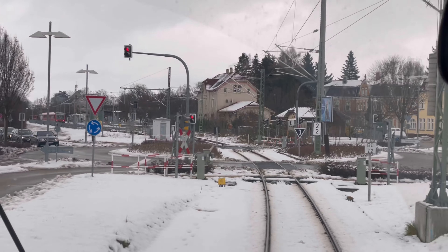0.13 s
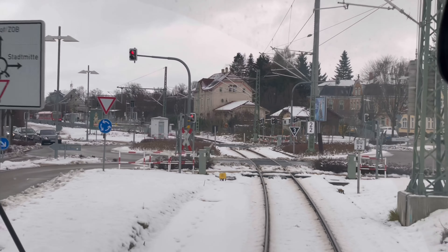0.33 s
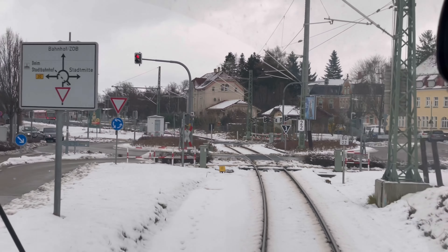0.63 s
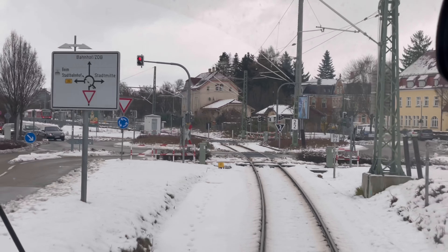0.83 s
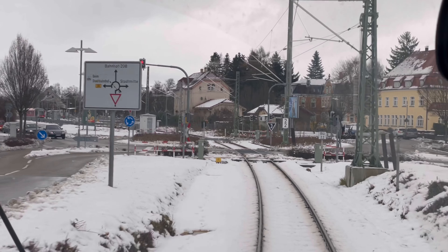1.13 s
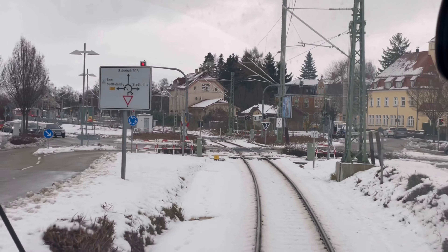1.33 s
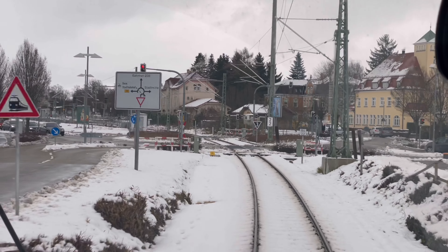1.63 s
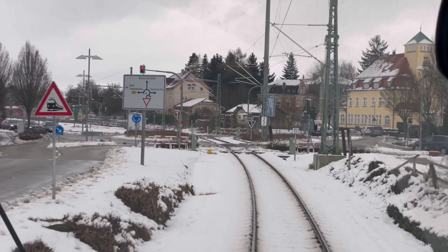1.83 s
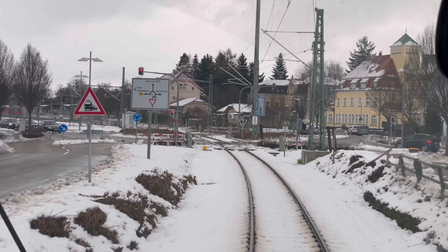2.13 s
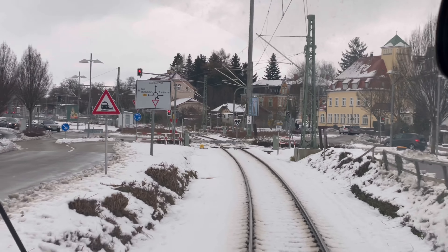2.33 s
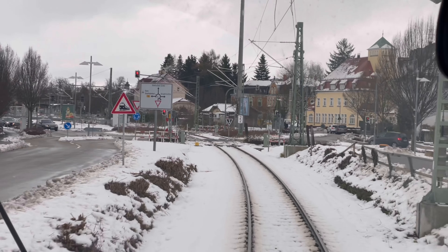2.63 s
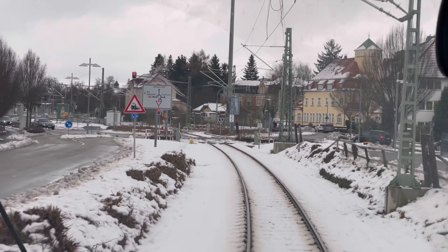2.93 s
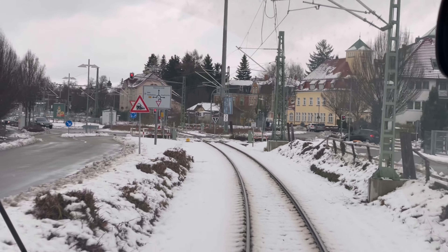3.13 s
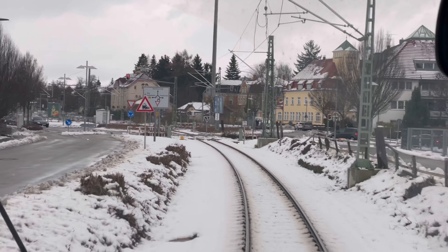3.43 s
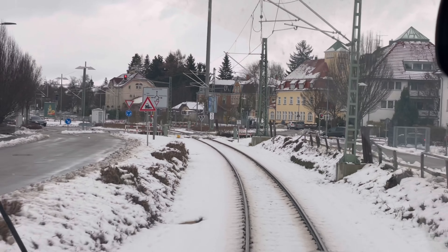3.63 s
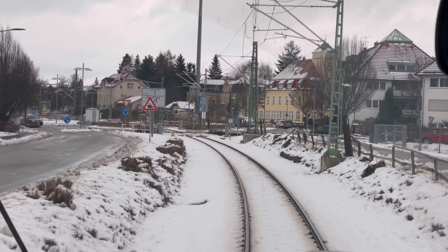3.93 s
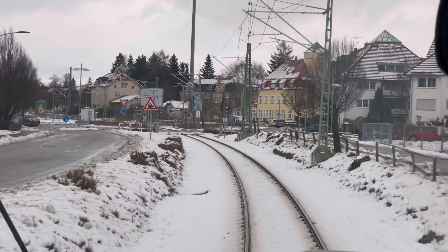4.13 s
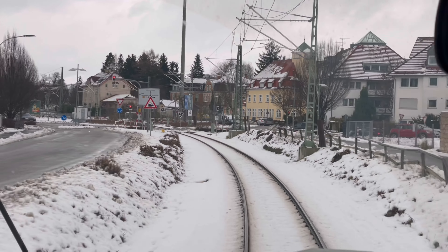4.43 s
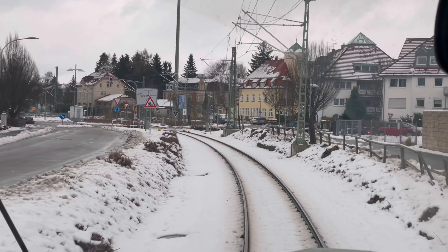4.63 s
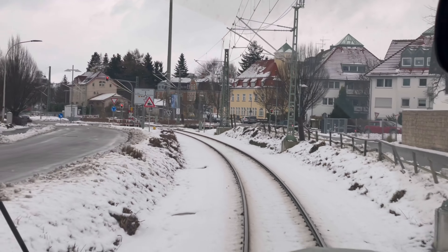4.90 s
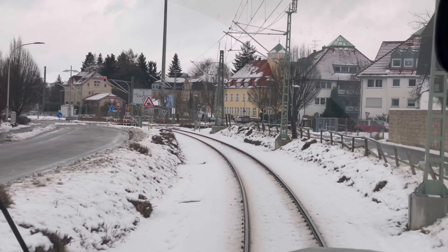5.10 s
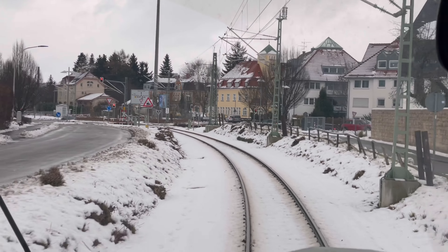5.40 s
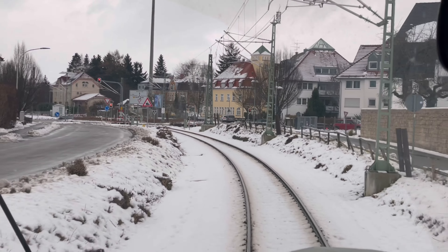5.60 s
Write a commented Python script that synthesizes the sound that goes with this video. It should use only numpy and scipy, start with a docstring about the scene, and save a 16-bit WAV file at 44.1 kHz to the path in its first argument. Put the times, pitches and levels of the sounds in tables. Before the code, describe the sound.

A stereo microphone inside a small railcar cab picks up a constant engine drone, deep body rumble and quiet blower air. An early dull jolt shakes the walls and loose fittings. After a calmer stretch, rougher rail makes the floor moan and flutter in short low tones; wheel rush and a hollow scrubbing howl, leaning left, peak around four seconds and stay uneven to the end.

```python
"""Diesel railcar cab, coasting round a curve

A six-cylinder engine idles as summed crank-cycle orders under the boom of the body, which is noise through modes.
One heavy thud comes early, lighter jolts later: pushed modes ring out. Rougher rail swells the floor drone and
the wheels' hollow howl: modal noise plus brief tones. Fittings chatter as random knocks; ventilation is steady
shaped noise with hiss and narrow whistles, beside a fan hum and thin whines."""
import sys
import numpy as np
from scipy import signal
from scipy.fft import rfft, irfft
from scipy.io import wavfile

SR = 44100
rng = np.random.default_rng(int(sys.argv[2]) if len(sys.argv) > 2 else 0)


def persist_wave(psi):
    """Save psi, clipped to +-1, as 16-bit WAV."""
    counts = np.round(np.clip(psi, -1, 1) * 32767).astype(np.int16)
    wavfile.write(sys.argv[1], SR, np.atleast_2d(counts).T)


N = 254016
TIME = np.arange(N) / SR
FREQS = np.fft.rfftfreq(N, 1 / SR)


def gain_of(db):
    """Decibels to amplitude."""
    return 10 ** (np.asarray(db) / 20)


def evened(x):
    """Scales a signal so that the mean of its channels has rms 1."""
    mono = np.atleast_2d(x).mean(0)
    return x / np.sqrt(np.mean(mono ** 2) + 1e-20)


def read(points):
    """Interpolates a table over log frequency."""
    hz, value = np.transpose(points)
    return np.interp(np.log(FREQS + 1), np.log(hz + 1), value)


def follow(table):
    """Interpolates a table over time."""
    s, value = np.transpose(table)
    return np.interp(TIME, s, value)


def resonances(modes):
    """Amplitude response of modes with steep skirts, summed in power."""
    power = 0
    for hz, width_hz, db in modes:
        power = power + gain_of(db) ** 2 / (1 + ((FREQS - hz) / width_hz) ** 2) ** 2
    return np.sqrt(power)


def wander(rate_hz):
    """Random control of rms 1: white noise low-passed at rate_hz."""
    lowpass = 1 / (1 + (FREQS / rate_hz) ** 2)
    return evened(irfft(rfft(rng.standard_normal(N)) * lowpass, N))


def swell(s, half_s):
    """A smooth rise and fall of height 1, centred on s."""
    return np.exp(-((TIME - s) / half_s) ** 2)


def noise(response, likeness, lean_db=0):
    """Stereo noise through a response; likeness sets the mid/side split, lean_db favours the left."""
    a, b, c, d = rng.standard_normal((4, len(FREQS)))
    same = np.clip(likeness, -1, 1)
    mid = np.sqrt(1 + same) * (a + 1j * b)
    side = np.sqrt(1 - same) * (c + 1j * d)
    left = (mid + side) * gain_of(lean_db / 2)
    right = (mid - side) * gain_of(-lean_db / 2)
    return evened(irfft(np.array([left, right]) * response, N))


# left-right likeness of running noise: f/Hz, likeness (-1 to 1, clipped)
LIKENESS = [(50, 1), (75, 0.95), (125, 0.74), (210, 0.95), (280, 0.65), (380, 0.5), (520, 0.24),
            (710, -0.3), (970, 0.13), (1320, 0.56), (1800, 1.02), (3300, 0.75), (7000, 0.18)]
# left over right: f/Hz, lean/dB
LEAN = [(60, 0), (110, -2), (160, -0.5), (215, -2), (280, -2.5), (420, 0.5), (490, 1.5), (535, 3.5),
        (570, -1), (700, 2), (1000, 2.5), (1800, 3.5), (3000, 0)]


def running(response, steady_s):
    """Noise from under the floor, its strength held even over spans longer than steady_s."""
    x = noise(response, read(LIKENESS), read(LEAN))
    window = np.hanning(max(int(steady_s * SR), 64))
    wrapped = np.pad(x.mean(0) ** 2, len(window), "wrap")
    power = signal.fftconvolve(wrapped, window / window.sum(), "same")
    return x / np.sqrt(power[len(window):][:N] + 1e-6)


def wavering(x, depth):
    """Bends stereo pitch at random by time warp; depth is the rms share of the pitch."""
    bent = TIME + np.cumsum(depth * wander(rate_hz=8)) / SR
    return np.array([np.interp(bent, TIME, side, period=N / SR) for side in x])


def ring_up(table, waver_rad):
    """Each row swells one mode into a brief tone, its phase wavering slightly."""
    drift = waver_rad * wander(rate_hz=5)
    out = np.zeros(N)
    for s, half_s, hz, db in table:
        phase = 2 * np.pi * (hz * (TIME - s) + rng.random()) + drift
        out += gain_of(db) * swell(s, half_s) * np.sin(phase)
    return np.sqrt(2) * out


# engine cycles of two crank turns each: t/s, f/Hz
CYCLE_RATE = [(0, 6.943), (2, 6.924), (5.76, 6.912)]
# engine orders, 6 = firing note: multiple of cycle rate, level/dB rms
ENGINE_ORDERS = [(6, -33.5), (7, -45.5), (10, -47), (11, -50), (12, -46), (13, -43), (14, -48), (18, -56.5),
                 (19, -53), (23, -47.5), (28, -46), (29, -44.5), (30, -43), (34, -55), (44, -50)]


def engine(waver_cycles=.00074):
    """Unequal cylinders add orders beside the firing note; neighbouring orders beat once a cycle."""
    cycles = np.cumsum(follow(CYCLE_RATE)) / SR + waver_cycles * wander(rate_hz=8.3)
    out = np.zeros(N)
    for order, db in ENGINE_ORDERS:
        out += gain_of(db) * np.sin(2 * np.pi * (round(order) * cycles + rng.random()))
    return np.sqrt(2) * out


# cooling fan and electronics: f/Hz, level/dB rms before flutter
AUXILIARY_TONES = [(135.2, -47), (5202, -98), (10405, -94), (15606, -91)]


def auxiliaries(flutter=.35):
    """A fan hum and thin whines that flutter in level."""
    out = np.zeros(N)
    for hz, db in AUXILIARY_TONES:
        out += gain_of(db) * np.sin(2 * np.pi * hz * TIME) * (1 + flutter * wander(rate_hz=3.9))
    return np.sqrt(2) * out


# car body modes: f/Hz, width/Hz, relative level/dB
BODY_MODES = [(56, 4.4, -11.5), (71.4, 5.5, 3), (104, 39, -4.5), (99, 5.9, -5.5), (133, 7.6, -8)]
# broad body spectrum: f/Hz, relative density/dB
BODY_SKIRT = [(10, -41), (22, -31.5), (36, -20), (60, -8.5), (150, -19), (260, -24.5), (350, -16.5),
              (420, -26), (700, -39), (1500, -59), (4000, -83)]


def boom():
    """The low modes of the car body under random shaking."""
    response = np.hypot(resonances(BODY_MODES), gain_of(read(BODY_SKIRT)))
    return running(response, steady_s=.22)


def body(level_db=-31.5, sway_db=1.0):
    """Bumps in the track boom in the car body, at a level that sways at random."""
    return gain_of(level_db + sway_db * wander(rate_hz=7.0)) * boom()


# rail roughness, before growth factors: t/s, level/dB
RAIL_ROUGHNESS = [(0, -15), (0.35, -9.5), (1.0, -13), (1.7, -10.5), (2.0, -3), (2.55, -2), (2.85, 0),
                  (3.02, -3), (3.35, -1), (3.8, 1), (4.5, -0.5), (4.8, -0.5), (5.4, -1.5), (5.76, 0.5)]
# floor panel modes: f/Hz, width/Hz, relative level/dB
LOW_FLOOR_MODES = [(193.9, 7, 0.5), (209, 16, -4.5), (223.5, 10, -5), (238.9, 7.5, 2.5), (253.3, 7, -3.5)]
HIGH_FLOOR_MODES = [(261.4, 9.8, -4), (280.2, 8, 1.5), (295.6, 10, -5), (333, 12, -18), (374, 8.3, -22),
                    (366, 120, -24)]
# rippled rail rings up one floor or body mode: t/s, half length/s, f/Hz, level/dB
SURGES = [(0.19, .035, 74, -29), (0.335, .025, 332, -29), (0.49, .04, 74, -26.5), (0.67, .03, 74, -27),
          (2.07, .04, 74, -27), (2.49, .04, 279, -29), (2.75, .025, 240, -17.5), (2.835, .055, 280, -21.5),
          (2.92, .022, 232, -23), (3.16, .035, 238, -20.5), (3.27, .07, 194, -27), (3.39, .022, 228, -22),
          (3.4, .022, 272, -24), (3.69, .025, 244, -20), (3.75, .022, 206, -24), (3.79, .022, 244, -20),
          (3.87, .022, 208, -23), (3.89, .025, 268, -23), (4.01, .025, 204, -20), (4.07, .022, 214, -20.5),
          (4.13, .03, 198, -25), (4.21, .022, 236, -20), (4.22, .055, 72, -29), (4.32, .025, 240, -20),
          (4.39, .022, 200, -20), (4.42, .06, 230, -26), (4.47, .022, 208, -23), (4.52, .022, 248, -21),
          (4.57, .022, 280, -24), (4.61, .022, 200, -21.5), (4.62, .04, 232, -22), (4.77, .03, 224, -22),
          (4.968, .022, 234, -17), (5.06, .028, 238, -19.5), (5.14, .022, 204, -23), (5.22, .022, 236, -22),
          (5.4, .022, 202, -21), (5.41, .055, 280, -27), (5.43, .022, 230, -23), (5.43, .055, 72, -29),
          (5.49, .022, 218, -19)]


def floor_drone(low_db=-27.0, high_db=-30.0, low_growth=1.0, high_growth=1.22, flutter_db=0.97):
    """Rail roughness shakes two groups of floor panels; close modes waver and beat, single ones surge."""
    flutter = flutter_db * wander(rate_hz=5)
    roughness_db = follow(RAIL_ROUGHNESS)
    low_gain = gain_of(low_db + low_growth * roughness_db + flutter)
    high_gain = gain_of(high_db + high_growth * roughness_db + flutter)
    low = low_gain * running(resonances(LOW_FLOOR_MODES), steady_s=.11)
    high = high_gain * running(resonances(HIGH_FLOOR_MODES), steady_s=.11)
    return wavering(low + high, depth=.008) + ring_up(SURGES, waver_rad=.25)


# sideways scrub in the curve, before growth factors: t/s, level/dB
SCRUB = [(0, -12), (0.25, -9), (0.8, -14), (1.95, -14), (2.25, -10.5), (2.5, -9), (3.45, -8.5), (3.7, -2),
         (4.2, -2), (4.5, -8), (5.0, -3.5), (5.76, -4)]
# wheel modes: f/Hz, width/Hz, relative level/dB
WHEEL_MODES = [(426, 7, -2), (439, 7, -1), (462, 10, -8), (488, 9, 1), (503, 8, -5), (524, 9, -2)]
# mode that sings in the curve: f/Hz, width/Hz, relative level/dB
SING_MODE = (541, 11, 0)
# wheel slips, before slip gain and lean: t/s, half length/s, f/Hz, level/dB
SLIPS = [(0.01, .04, 545, -43.5), (0.21, .05, 544, -40), (0.41, .06, 543, -42), (2.06, .08, 545, -46),
         (2.26, .03, 490, -39.5), (2.32, .04, 540, -44), (2.52, .055, 540, -41), (2.86, .035, 544, -35),
         (3.23, .04, 544, -43), (3.33, .03, 492, -42), (3.6, .03, 440, -39), (3.65, .03, 538, -32.5),
         (3.705, .028, 488, -31.5), (3.77, .022, 536, -39), (3.85, .025, 488, -35), (3.85, .022, 528, -39),
         (3.9, .028, 538, -35), (3.9, .04, 438, -38), (3.95, .022, 528, -39), (4.01, .03, 440, -41),
         (4.06, .06, 426, -38), (4.22, .025, 438, -36), (4.22, .055, 542, -38), (4.25, .025, 484, -37),
         (4.6, .025, 428, -37), (4.76, .04, 542, -40), (4.88, .04, 522, -41), (4.93, .03, 494, -40),
         (4.95, .022, 536, -39), (4.99, .04, 436, -39), (5.08, .025, 488, -39), (5.13, .022, 434, -39),
         (5.21, .025, 546, -39), (5.31, .025, 542, -36), (5.37, .022, 488, -38), (5.42, .022, 440, -39),
         (5.46, .028, 542, -34.5), (5.47, .03, 490, -38), (5.58, .028, 436, -37), (5.69, .035, 542, -37)]


def howl(howl_db=-41.0, howl_growth=0.7, sing_db=-47.0, sing_growth=0.5, slip_db=-1.6, slip_lean_db=6):
    """Scrubbing wheels howl, hollow and wavering; each slip locks one mode into a tone, mostly left."""
    scrub_db = follow(SCRUB)
    catching_db = 2.5 * wander(rate_hz=7)
    hollow_gain = gain_of(howl_db + howl_growth * scrub_db)
    sing_gain = gain_of(sing_db + sing_growth * scrub_db + catching_db)
    hollow = hollow_gain * running(resonances(WHEEL_MODES), steady_s=.22)
    sing = sing_gain * running(resonances([SING_MODE]), steady_s=.22)
    slips = gain_of(slip_db) * ring_up(SLIPS, waver_rad=.5)
    lean = gain_of([[slip_lean_db / 2], [-slip_lean_db / 2]])
    return wavering(hollow + sing, depth=.008) + slips * lean


# loose cab fittings: f/Hz, width/Hz, relative level/dB
RATTLE_MODES = [(770, 150, 5), (1160, 56, -3), (1680, 330, -6.5), (2460, 690, -10.5)]


def rattle(per_s, ring_s=0.0034):
    """Uneven knocks at random moments, each a quick swell and decay of noise through the fittings' modes."""
    knocks = (rng.random(N) < per_s / SR) * rng.uniform(.4, 1, N)
    age = TIME[:SR // 8] / ring_s
    shaking = signal.fftconvolve(knocks, age * np.exp(-age))[:N]
    return evened(shaking * noise(resonances(RATTLE_MODES), read(LIKENESS), read(LEAN)))


# rolling level, before offsets and growth: t/s, level/dB
ROLLING = [(0, -10.5), (1.75, -15), (2.2, -11.5), (2.85, -8), (3.1, -10), (3.5, -7), (3.65, -2.5),
           (3.92, -0.5), (4.25, -5), (4.45, -5), (4.8, -7.5), (5.0, -4.5), (5.25, -5.5), (5.52, -2.5),
           (5.76, -3.5)]
# rush and sizzle spectra: f/Hz, relative density/dB
RUSH_SHAPE = [(100, -16.5), (250, 1), (370, 5.5), (580, 2.5), (640, 11), (760, 3.5), (950, 2.5),
              (1200, -3.5), (1700, -5), (2300, -11.5), (2900, -10.5), (3300, -21.5), (4300, -46.5)]
GRIT_SHAPE = [(2000, -22.5), (3900, 8), (4400, -4), (4900, 2), (5700, -3.5), (7100, 2.5), (7700, -3),
              (9000, -26.5), (12000, -13), (15500, -20)]


def wheels(rush_db=-53.0, rush_scrub_db=-45.0, grit_db=-74.5, grit_scrub_db=-69.0,
           rattle_db=-55, rattle_growth=0.44):
    """Rolling wheels: a rush and a faint sizzle, each part steady, part swelling; fittings chatter along."""
    rolling_db = follow(ROLLING)
    rush_level = np.hypot(gain_of(rush_db), gain_of(rush_scrub_db + rolling_db))
    grit_level = np.hypot(gain_of(grit_db), gain_of(grit_scrub_db + rolling_db))
    rush = rush_level * running(gain_of(read(RUSH_SHAPE)), steady_s=.44)
    grit = grit_level * running(gain_of(read(GRIT_SHAPE)), steady_s=.44)
    # wheel load varies on uneven rail
    load = 1 + .09 * wander(rate_hz=25)
    chatter = gain_of(rattle_db + rattle_growth * rolling_db) * rattle(per_s=140)
    return load * (rush + grit) + chatter


# blower and hiss spectra: f/Hz, relative density/dB
VENT_SHAPE = [(200, -11), (600, -6.5), (1000, -8), (1250, -8.5), (1550, 3.5), (1780, -1), (2150, -1),
              (2280, -9), (2480, -3), (2950, -14), (3100, -26), (3750, -18), (4300, -37), (6000, -48.5)]
AIR_SHAPE = [(5000, -18.5), (9000, -29.5), (11000, 6), (12000, 8), (13800, 9.5), (15500, 0.5)]
# duct modes: f/Hz, width/Hz, relative level/dB
DUCT_MODES = [(1740, 99, 1.5), (2890, 23, 0.5), (3418, 66, -6), (3700, 96, -11.5)]


def ventilation(blower_db=-55.0, air_db=-79):
    """Air rushes through ducts that ring faintly, under a thin hiss."""
    response = np.hypot(gain_of(read(VENT_SHAPE)), resonances(DUCT_MODES))
    blower = gain_of(blower_db) * noise(response, likeness=.985)
    hiss = gain_of(air_db) * noise(gain_of(read(AIR_SHAPE)), likeness=.95)
    return blower + hiss


# duct whistles: f/Hz, width/Hz, level/dB
WHISTLES = [(1807, 14, -70), (1946, 12, -73), (2023, 5, -71), (2093, 8, -68.5), (2389, 14, -77),
            (2820, 16, -71), (3343, 8, -81), (4715, 8, -94), (4759, 8, -93), (4822, 12, -91),
            (5320, 20, -92), (5900, 10, -98)]
# flange touches that squeal: t/s, half length/s, f/Hz, level/dB
SQUEALS = [(0.18, 0.06, 3345, -69), (0.38, 0.06, 3340, -74), (1.0, 0.15, 3350, -77),
           (1.57, 0.04, 3345, -74), (1.73, 0.039, 3345, -70), (4.747, 0.01, 6700, -71)]


def whistles():
    """Narrow noise bands come and go in the ducts; a thin flange squeal touches in now and then."""
    out = np.zeros((2, N))
    for hz, width_hz, db in WHISTLES:
        out += gain_of(db) * noise(resonances([(hz, width_hz, 0)]), likeness=1.0)
    return out + ring_up(SQUEALS, waver_rad=1)


# bogie jolts: t/s, relative level/dB, push length/s
JOLTS = [(0.313, -22, 0.075), (0.766, -31, 0.043), (1.215, -36, 0.044), (3.16, -37.5, .04),
         (5.199, -32.5, 0.06)]
# modes a jolt rings: f/Hz, relative level/dB, t60/s
JOLT_MODES = [(60, 1.5, 0.06), (75.14, 6, 0.45), (97, 2, 0.11), (126, -3.5, 0.14)]
# cab walls: f/Hz, width/Hz, relative level/dB
WALL_MODES = [(265, 34, -3), (323, 20, -1.5)]


def thud(ring_db=-1.3, rumble_db=-6, rumble_s=0.16, panels_db=-11, scrunch_db=-33.5,
         scrunch_tilt_db_per_octave=3.0, grit_db=-48.5, rattle_db=-30.0, spread=0.64):
    """A jolt pumps up the body, which rings and rumbles out; walls shake, wheels scrunch, fittings rattle."""
    ring, shake, load = np.zeros((3, N))
    for s, level_db, length_s in JOLTS:
        push = np.exp(-2 * ((TIME - s) / length_s) ** 2)
        for hz, db, t60_s in JOLT_MODES:
            decay = np.exp(-np.log(1000) / (t60_s * SR))
            swing = signal.lfilter([1], [1, -decay], push + 1e-12)
            tone = np.sin(2 * np.pi * hz * (TIME - s))
            ring += gain_of(level_db + ring_db + db) * swing / swing.max() * tone
        aftershake = signal.lfilter([1], [1, -np.exp(-1 / (rumble_s * SR))], push + 1e-12)
        shake += gain_of(level_db) * aftershake / aftershake.max()
        load += gain_of(level_db) * swell(s + length_s / 3, spread * length_s)
    tilt_db = scrunch_tilt_db_per_octave * np.log2(np.clip(FREQS, 250, 2000) / 1000)
    panels = gain_of(panels_db) * running(resonances(WALL_MODES), steady_s=.022)
    scrunch = gain_of(scrunch_db) * running(gain_of(read(RUSH_SHAPE) + tilt_db), steady_s=.44)
    grit = gain_of(grit_db) * running(gain_of(read(GRIT_SHAPE)), steady_s=.44)
    chatter = gain_of(rattle_db) * rattle(per_s=110)
    rumble = gain_of(rumble_db) * shake * boom()
    return ring + rumble + load * (panels + scrunch + grit + chatter)


# harder shakes of the fittings: t/s, level/dB
KNOCKS = [(0.352, -50.5), (0.67, -57), (0.99, -52), (2.15, -57), (2.33, -58.5), (3.66, -52.5),
          (4.006, -52.5), (4.27, -54), (5.69, -58)]


def fittings(knock_s=0.027):
    """Now and then a loose fitting shakes harder: swells of noise through the rattle modes."""
    shaking = sum(gain_of(db) * swell(s, knock_s) for s, db in KNOCKS)
    return shaking * noise(resonances(RATTLE_MODES), read(LIKENESS), read(LEAN))


def scene():
    """Everything heard in the cab."""
    steady = engine() + auxiliaries() + body() + ventilation() + whistles()
    return steady + floor_drone() + howl() + wheels() + thud() + fittings()


def record(dry, edge_hz=15750):
    """Low-passes at edge_hz, with the ends eased over a few milliseconds."""
    eased = dry * signal.windows.tukey(N, .002)
    lowpass = signal.firwin(1023, edge_hz, window=("kaiser", 9), fs=SR)
    return signal.oaconvolve(eased, lowpass[None], "same")


dry = scene()
out = record(dry)
persist_wave(out)
```